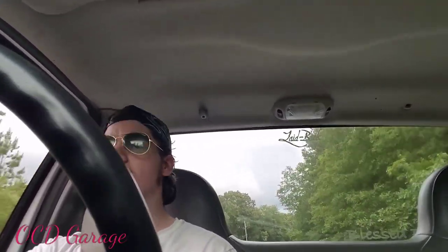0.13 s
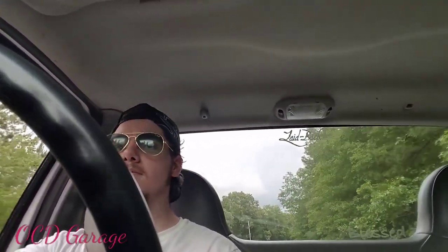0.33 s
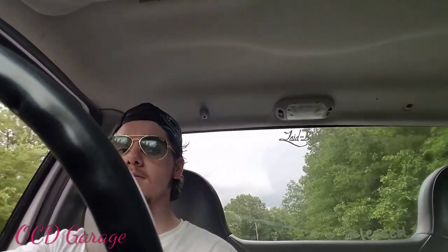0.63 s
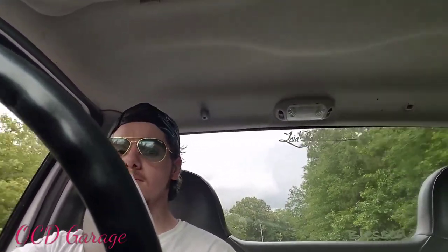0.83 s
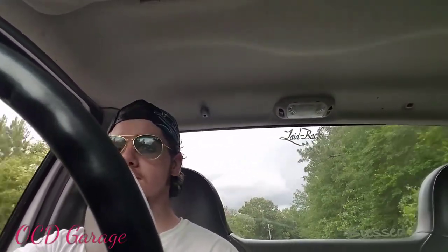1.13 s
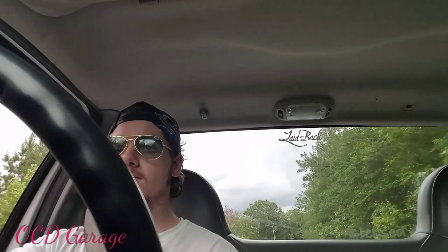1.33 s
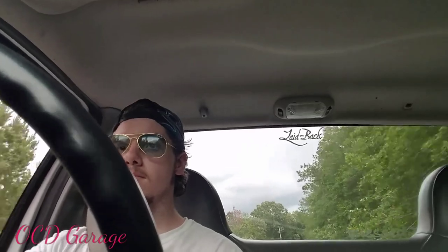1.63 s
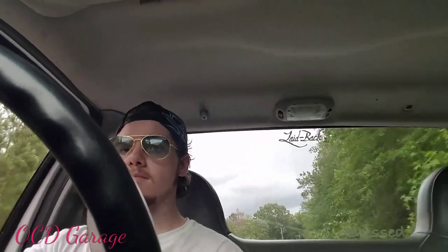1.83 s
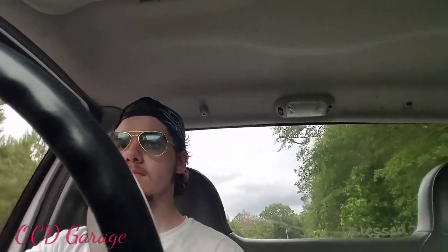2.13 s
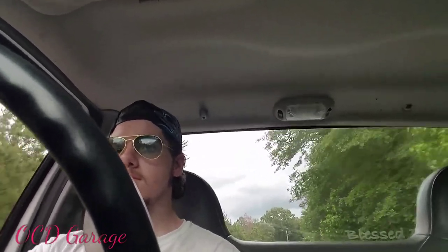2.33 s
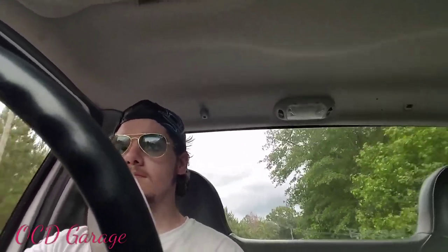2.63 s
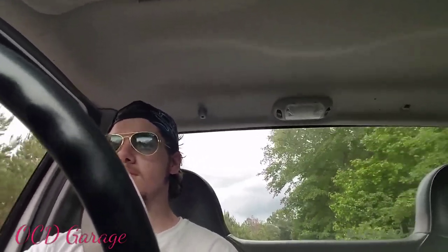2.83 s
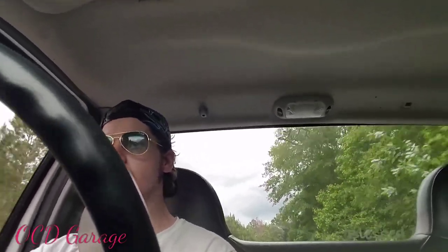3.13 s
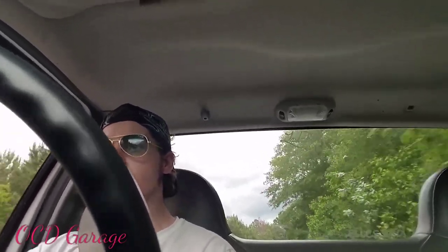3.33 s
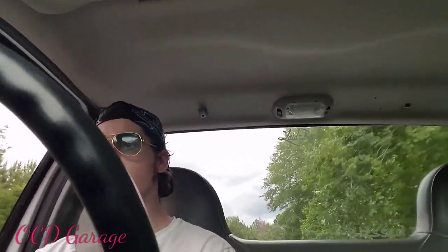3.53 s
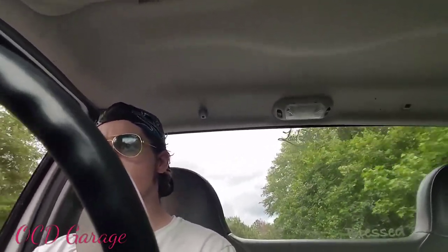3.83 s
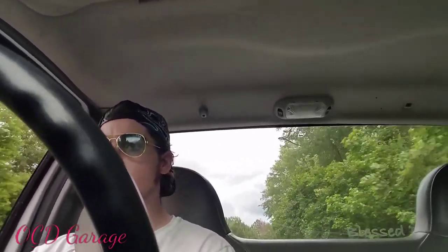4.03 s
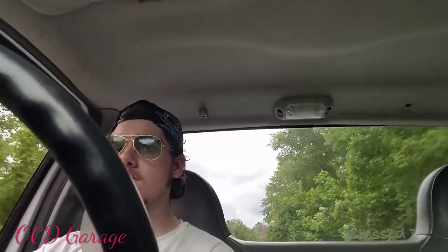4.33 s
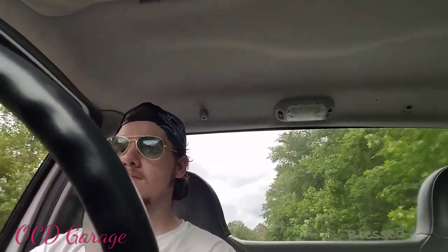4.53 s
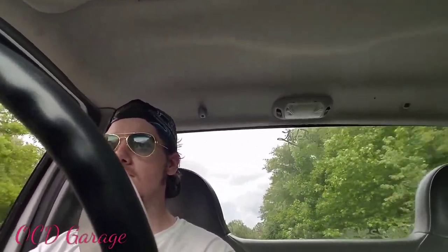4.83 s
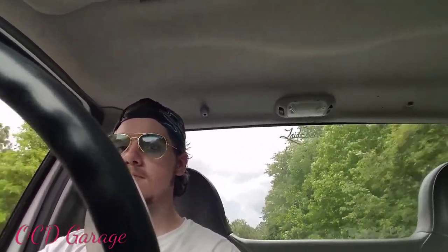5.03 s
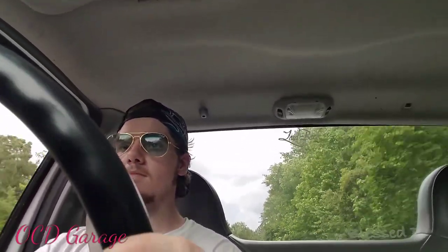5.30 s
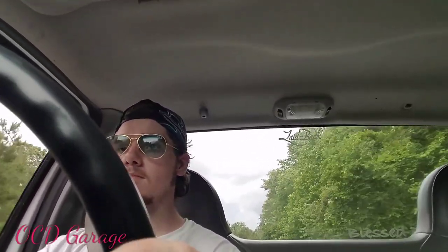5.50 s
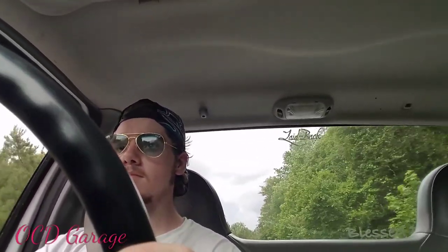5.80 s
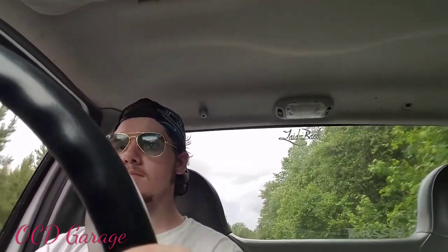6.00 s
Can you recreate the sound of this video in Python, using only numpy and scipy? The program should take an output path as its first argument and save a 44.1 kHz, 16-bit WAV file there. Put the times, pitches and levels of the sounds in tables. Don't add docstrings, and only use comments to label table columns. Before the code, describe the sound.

Inside a diesel truck cab, a rumbling coast gives way to throttle, a breathy turbo whistle climbing over steady exhaust drone while wind thumps.

```python
import sys
import numpy as np
from scipy import signal
from scipy.io import wavfile
from scipy.ndimage import uniform_filter1d

SR = 44100
rng = np.random.default_rng(int(sys.argv[2]) if len(sys.argv) > 2 else 0)


def persist_wave(psi):
    counts = np.round(np.clip(psi, -1, 1) * 32767).astype(np.int16)
    wavfile.write(sys.argv[1], SR, np.atleast_2d(counts).T)


def magnitude_from_level(level_db):
    exponent = np.asarray(level_db, float) / 20
    return 10 ** exponent


N = 271656


def rms_one(x):
    return x / np.sqrt(np.mean(x ** 2) + 1e-20)


def in_time(rows):
    s, *columns = np.transpose(rows)
    return [np.interp(np.arange(N) / SR, s, c) for c in columns]


def at_hz(points, hz):
    table_hz, table_value = np.transpose(points)
    return np.interp(np.log(hz), np.log(table_hz), table_value)


def rise(start_s, length_s):
    x = np.clip((np.arange(N) / SR - start_s) / length_s, 0, 1)
    return x * x * (3 - 2 * x)


def swell(s, half_s):
    return np.exp(-((np.arange(N) / SR - s) / half_s) ** 2)


def drift(rate_hz):
    hop = 40
    r = np.exp(-2 * np.pi * rate_hz * hop / SR)
    white = rng.standard_normal(N // hop + 2002)
    slow = signal.lfilter([1], [1, -2 * r, r * r], white)[2000:]
    return np.interp(np.arange(N) / hop, np.arange(len(slow)), rms_one(slow))


def butter(x, hz, kind, order=2):
    return signal.sosfilt(signal.butter(order, hz, kind, fs=SR, output="sos"), x)


def bell(x, hz, width_hz, db):
    r = np.exp(-np.pi * width_hz / SR)
    poles = [1, -2 * r * np.cos(2 * np.pi * hz / SR), r * r]
    ring = signal.lfilter(np.array([1, 0, -1]) * (1 - r * r) / 2, poles, x)
    return x + (magnitude_from_level(db) - 1) * ring


def banded_noise(spectrum, patchy_db, count):
    # hz, likeness (-1..1)
    likeness = [(30, 0.98), (130, 0.95), (420, 0.57), (680, 0.33), (860, -0.049), (1380, -0.45),
                (1750, -0.22), (2150, 0.47), (2800, -0.21), (14000, 0.1)]
    edges_hz = np.geomspace(spectrum[0][0], spectrum[-1][0], count + 1)
    out, together = 0, drift(2.5)
    white = rng.standard_normal((2, 2, N))
    for k, (low_hz, high_hz) in enumerate(zip(edges_hz, edges_hz[1:])):
        mid, side = butter(white[k % 2], [low_hz, high_hz], "band")
        hz = np.sqrt(low_hz * high_hz)
        alike = np.clip(at_hz(likeness, hz), -1, 1)
        flicker_db = patchy_db * (0.42 * together + drift(26.0))
        pair = np.sqrt(1 + alike) * mid + np.sqrt(1 - alike) * side * [[1], [-1]]
        out = out + magnitude_from_level(at_hz(spectrum, hz) + flicker_db) * pair
    return rms_one(out)


def throttle():
    return rise(1.3, 0.25)


def by_load(coast_db, load_db):
    return coast_db + (load_db - coast_db) * rise(1.34, 0.53)


def trim():
    # pitch_hz, width_hz, level_db
    panel_hums = [(220, 6, 0), (350, 8, -3), (412, 8, -2)]
    # centre_s, level_db, half_length_s
    rough = [
        (0.63, -29.5, 0.21),
        (1.186, -32.5, 0.15),
        (1.6, -34.5, .25),
    ]
    calm_db, fade_db_per_s = -46.5, 6
    t, (last_s, last_db, _) = np.arange(N) / SR, rough[-1]
    settling = np.where(t > last_s, magnitude_from_level(last_db - fade_db_per_s * (t - last_s)), magnitude_from_level(calm_db))
    shake = np.maximum(settling, sum(magnitude_from_level(db) * swell(s, half_s) for s, db, half_s in rough))
    push = rng.standard_normal(N)
    hum = sum(magnitude_from_level(db) * rms_one(bell(push, hz, width_hz, 6.0) - push) for hz, width_hz, db in panel_hums)
    return shake * rms_one(hum)


def cab_boom():
    # hz, density_db per Hz
    boom_spectrum = [(18, -6), (30, -0.5), (55, 4.5), (75, -7.5), (110, -1), (150, -14.5), (250, -11.5),
                     (320, -42), (500, -40)]
    # centre_s, boom_change_db, half_length_s
    jolts = [(0.0, 16, 0.023), (0.152, -9, 0.045), (0.6, 3, .12), (1.18, 5, .06), (1.877, 4, 0.078),
             (2.047, 8, 0.025), (2.3, 3.5, 0.11), (2.863, 4.5, 0.12), (3.28, 6.5, 0.056), (3.7, 4.5, 0.065),
             (4.0, 1.5, 0.31), (4.375, 5.5, 0.044), (4.6, 2, 0.23), (5.19, 1.5, .06), (5.616, 2, 0.13)]
    boom_db = by_load(-31.0, -18.0) + sum(db * swell(s, half_s) for s, db, half_s in jolts)
    boom = magnitude_from_level(boom_db) * banded_noise(boom_spectrum, patchy_db=1.2, count=9)
    coasting = magnitude_from_level(2.0) * bell(boom, 76.0, 115.0, -3.0)
    opening = throttle()
    return opening * boom + (1 - opening) * coasting


def panel_wash():
    # hz, density_db per Hz
    wash_spectrum = [(60, 4.5), (110, -2.5), (150, -12), (230, -5), (420, -5), (770, -8.5), (1350, -14),
                     (1900, -19.5), (2450, -20.5), (2900, -26), (3500, -40), (5500, -42), (10000, -39.5),
                     (15000, -59)]
    # pitch_hz, width_hz, gain_db
    panels = [(562, 16, 2), (768, 37, 5.5), (947, 35, 2), (1036, 68, 5), (1457, 130, 6.5)]
    surge_db = 1.2 * swell(2.1, 0.4)
    wash_db = by_load(-34, -32.0) + surge_db
    wash = banded_noise(wash_spectrum, patchy_db=0.95, count=20)
    for hz, width_hz, db in panels:
        wash = bell(wash, hz, width_hz, db)
    return magnitude_from_level(wash_db + 5.5) * rms_one(wash)


def intake():
    # hz, density_db per Hz
    hiss_spectrum = [(1500, 8), (2500, 1), (3600, 6), (5000, -2), (7000, 1.5), (9000, -4), (11500, -3.5),
                     (14500, 0.5)]
    start_s, rise_s, settle_s = 1.01, 0.65, 0.45
    shut_db, peak_db, steady_db = -59.5, -45.5, -49.5
    after_s = np.maximum(np.arange(N) / SR - start_s - rise_s, 0)
    open_db = steady_db + (peak_db - steady_db) * np.exp(-after_s / settle_s)
    open_db = open_db - 2.5 * swell(5.32, 0.27)
    hiss_db = shut_db + (open_db - shut_db) * rise(start_s, rise_s) ** 0.4
    gate = np.clip((hiss_db + 67.0) / 6, 0, 1)
    return magnitude_from_level(hiss_db + 11.0) * gate * banded_noise(hiss_spectrum, patchy_db=0.86, count=8)


def wind():
    # centre_s, buffet_db, half_length_s, left_minus_right_db
    gust_table = [(0.1, -41, .2, -2), (0.576, -41, 0.092, 9), (0.798, -38, .07, 8), (1.0, -42, .07, -1),
                  (1.52, -42, 0.091, 0), (1.801, -33, .15, -4), (2.13, -31.5, 0.15, -2),
                  (2.401, -18.5, 0.088, 14), (2.62, -21, 0.095, 3), (3.1, -35, 0.05, -9),
                  (3.41, -25.5, 0.095, 15), (3.603, -30, 0.068, -3), (3.899, -28.5, 0.075, 13),
                  (4.487, -22, 0.11, 13), (4.803, -27, .07, 1), (5.034, -26.5, 0.094, 3),
                  (5.423, -21, 0.057, 2), (5.583, -19, .07, -6), (5.807, -25.5, 0.086, 6),
                  (6.06, -24.5, .13, 4)]
    # centre_s, flutter_db, thump_over_flutter_db, left_minus_right_db
    puffs = [(0.528, -29, 4, 6), (0.734, -32.5, 11.5, 6), (1.994, -27, 3, -7.2), (2.233, -32, 2, 0),
             (2.35, -20.5, 2, 16), (2.418, -25, 2, 13), (2.673, -22, -3, -13.1), (2.736, -20.5, -2, -0.5),
             (3.397, -28, 1, 13.6), (3.497, -31, -9, 6), (3.619, -46, -7, 9), (3.776, -27.5, 4, 6),
             (3.912, -38, 21, 11), (4.45, -14.5, 0, 24), (4.853, -30.0, 0, -2.8), (5.087, -33, 15, 10),
             (5.469, -36, 21, 21), (5.597, -34, 10, 10), (5.696, -35, 8, 3), (5.775, -32, 14, 0),
             (5.833, -25, 5, 13), (6.06, -25.5, 9, 7)]
    calm = magnitude_from_level(by_load(-57, -35.5))
    t, out = np.arange(N) / SR, []
    for side in (1, -1):
        low = rms_one(butter(rng.standard_normal(N), [45, 190], "band"))
        high = butter(rng.standard_normal(N), [170, 330], "band", order=1)
        high = rms_one(butter(high, 720, "low"))
        flutter, thump = np.zeros((2, N))
        for s, db, thump_db, lean_db in puffs:
            near = slice(max(int((s - .12) * SR), 0), int((s + .12) * SR))
            slap_db = db - 0.5 + min(0.96 * side * lean_db, 2.5)
            slap = magnitude_from_level(slap_db) * np.exp(-((t[near] - s) / 0.018) ** 2)
            flutter[near] += slap
            thump[near] += slap * magnitude_from_level(thump_db)
        gusts = sum(magnitude_from_level(db + 0.29 * side * pan_db) * swell(s, half_s) for s, db, half_s, pan_db in gust_table)
        lumps = (calm + gusts) * magnitude_from_level(0.5 + 2.4 * drift(13.0))
        out.append((lumps + thump) * low + (magnitude_from_level(-18) * lumps + flutter) * high)
    return np.array(out)


def engine():
    # time_s, firing_hz, drone_db
    firing = [(1.2, 172.8, -33), (1.5, 175.7, -29.5), (1.65, 180.5, -26), (2, 186.1, -24), (2.3, 188, -25),
              (3, 186.3, -23), (4, 187.1, -24.5), (5.5, 188.2, -27), (6.16, 187.9, -25.5)]
    # multiple of the eight-firing cycle, level_db
    orders = [(2.5, -9), (4, -7.5), (5, -3.5), (6, -17), (7, -9), (8, 1.5)]
    firing_hz, drone_db = in_time(firing)
    cycle = 2 * np.pi * np.cumsum(firing_hz * (1 + .002 * drift(3.0))) / (8 * SR)
    lines = 0
    for k, db in orders:
        lines = lines + magnitude_from_level(db + 1.43 * drift(7.4)) * np.sin(k * cycle + rng.uniform(0, 2 * np.pi))
    lean = magnitude_from_level(np.array([[.4], [-.4]]))
    return np.sqrt(2) * throttle() * magnitude_from_level(drone_db) * lines * lean


def turbo():
    # time_s, whistle_hz, whistle_db
    spool = [(0, 2411, -62), (1.1, 2447, -55), (1.3, 2680, -43.5), (1.52, 3010, -39), (1.7, 3227, -42.5),
             (1.85, 3574, -47.5), (2.02, 3883, -40), (2.3, 4180, -35.5), (2.6, 4334, -41), (2.8, 4393, -37),
             (3.25, 4476, -37), (4.2, 4463, -38), (4.5, 4440, -35), (5.3, 4448, -39.5), (5.75, 4479, -35.5),
             (6.16, 4437, -38.5)]
    # multiple, level_db, half_width_hz, left_minus_right_db
    partials = [
        (1, 0, 132, -4.5),
        (1.025, -4.5, 292, 0),
        (1.97, -15, 340, 5.5),
        (3, -14.5, 1000, 4.5),
    ]
    # whistle_hz, level_db
    shrill = [(2420, -59), (2850, -42), (3250, -37), (4190, -32), (4340, -36.5), (4480, -37)]
    whistle_hz, whistle_db = in_time(spool)
    whistle_hz = uniform_filter1d(whistle_hz, size=SR // 5)
    shrill_db = at_hz(shrill, whistle_hz)
    spin = whistle_hz / whistle_hz.max()
    turn = 2 * np.pi * np.cumsum(whistle_hz * (1 + .005 * drift(15.14))) / SR
    churn = np.cumsum(spin ** 1.25)
    out = 0
    for k, db, half_hz, pan_db in partials:
        is_whistle = k < 1.5
        eddies = butter(rng.standard_normal((4, N)), half_hz, "low")
        if is_whistle:
            eddies = [np.interp(churn, np.arange(N), e) for e in eddies]
        a, b = np.reshape(eddies, (2, 2, N))
        tone = rms_one(a * np.cos(k * turn) + b * np.sin(k * turn))
        level_db = whistle_db if is_whistle else shrill_db
        pan = magnitude_from_level(pan_db / 2 * np.array([[1], [-1]]))
        out = out + magnitude_from_level(level_db + db + 0.87 * drift(20.0)) * tone * pan
    return magnitude_from_level(0.5) * out


def scene():
    return trim() + cab_boom() + panel_wash() + intake() + wind() + engine() + turbo()


def band_limit(x):
    return signal.sosfilt(signal.butter(12, 15220, fs=SR, output="sos"), x)


def record(dry):
    # centre_hz, width_hz, gain_db
    port_dips = [
        [(7350, 2600, -5.5), (7700, 750, -13), (10340, 1100, -2)],
        [(9400, 1200, -6), (10100, 1100, -12), (10600, 1400, -14)],
    ]
    headroom, cutoff_hz = .9, 14490
    rounded = headroom * np.tanh(butter(dry, 17.5, "high") / headroom)
    ports = []
    for x, dips in zip(rounded, port_dips):
        for hz, width_hz, db in dips:
            x = bell(x, hz, width_hz, db)
        ports.append(x)
    top_cut = signal.ellip(10, .5, 70, cutoff_hz, fs=SR, output="sos")
    return band_limit(signal.sosfilt(top_cut, np.array(ports)))


dry = scene()
out = record(dry)
persist_wave(out)
```